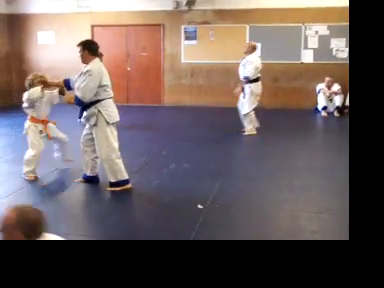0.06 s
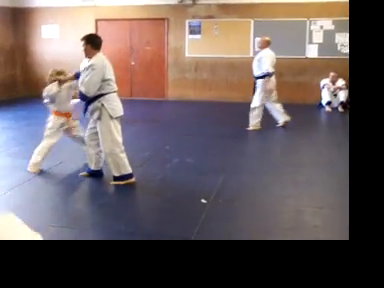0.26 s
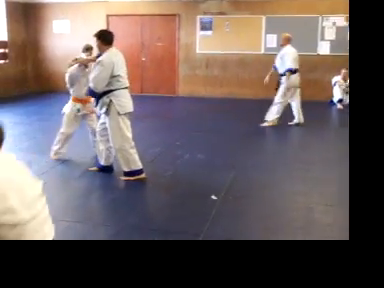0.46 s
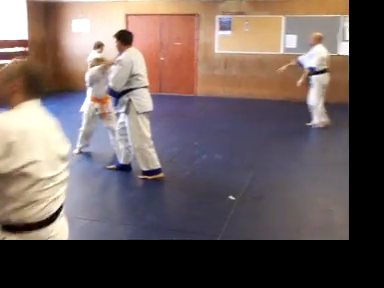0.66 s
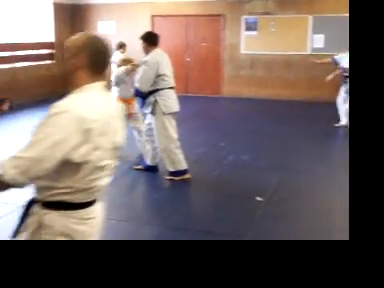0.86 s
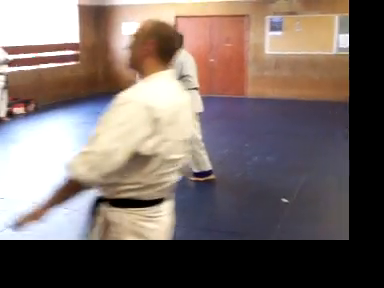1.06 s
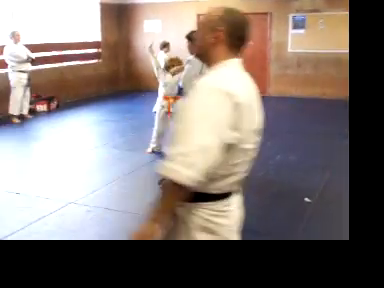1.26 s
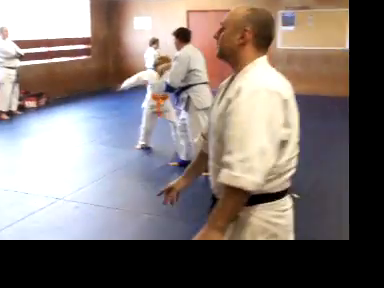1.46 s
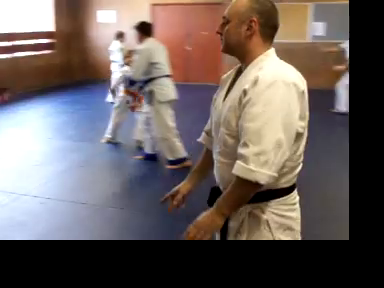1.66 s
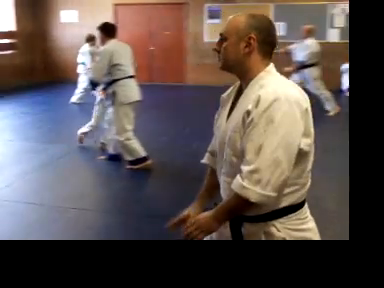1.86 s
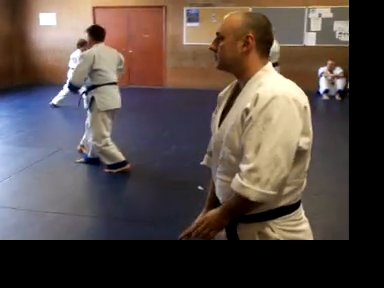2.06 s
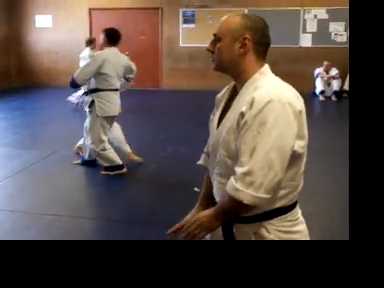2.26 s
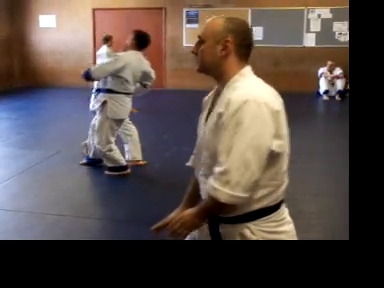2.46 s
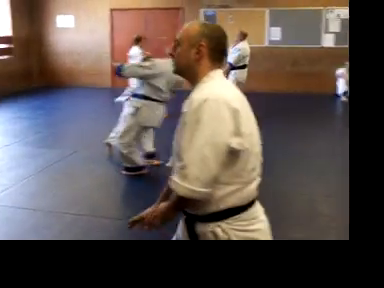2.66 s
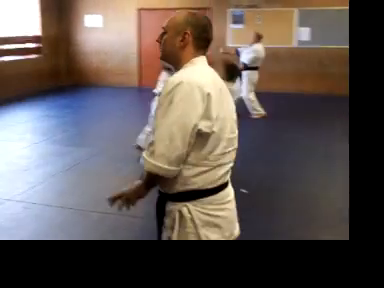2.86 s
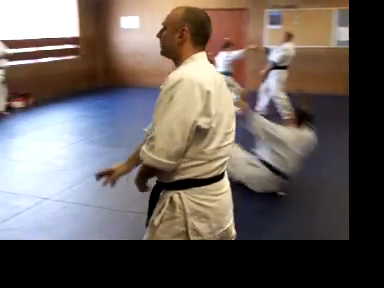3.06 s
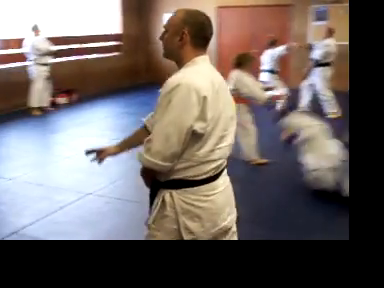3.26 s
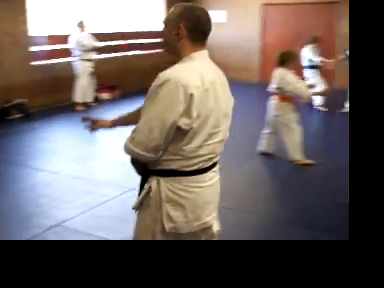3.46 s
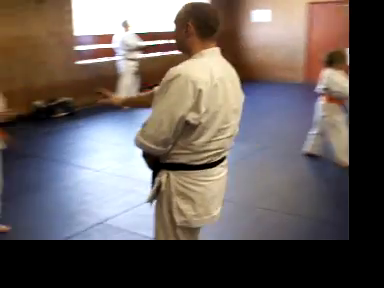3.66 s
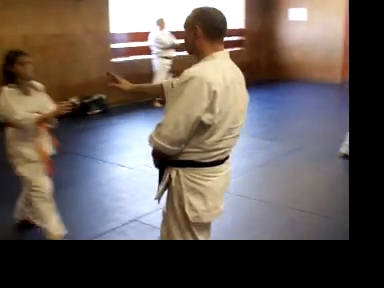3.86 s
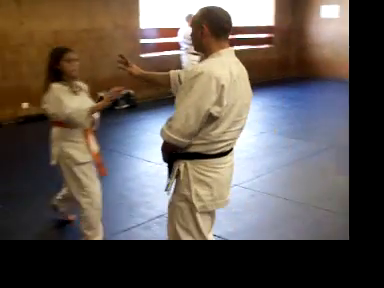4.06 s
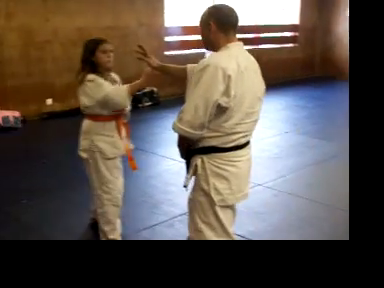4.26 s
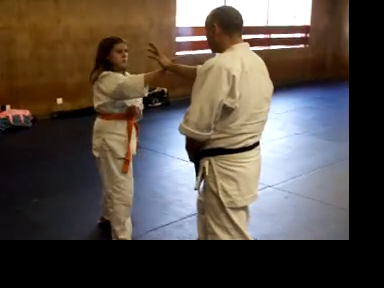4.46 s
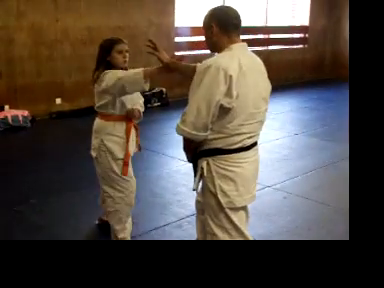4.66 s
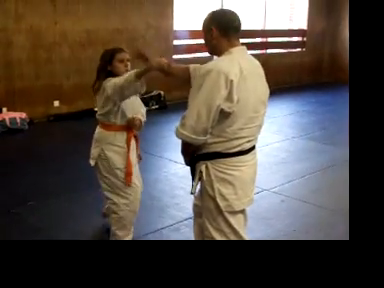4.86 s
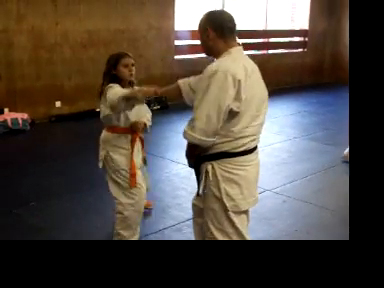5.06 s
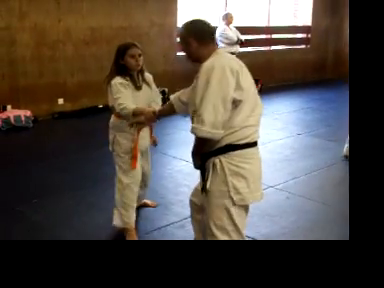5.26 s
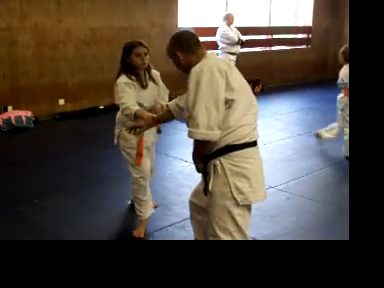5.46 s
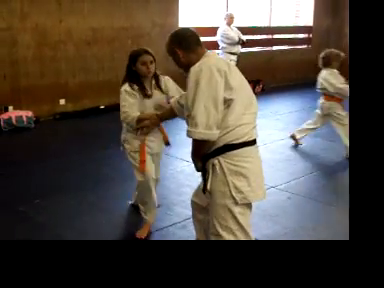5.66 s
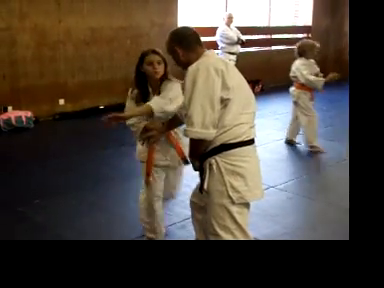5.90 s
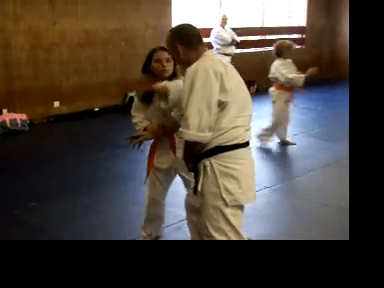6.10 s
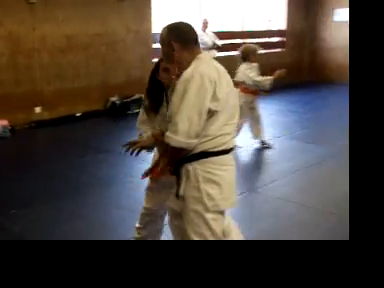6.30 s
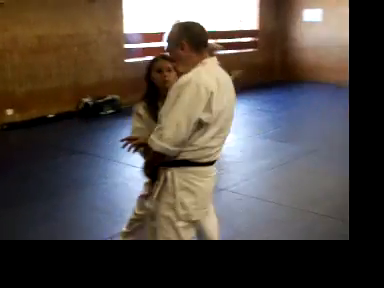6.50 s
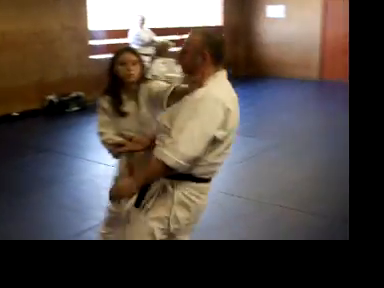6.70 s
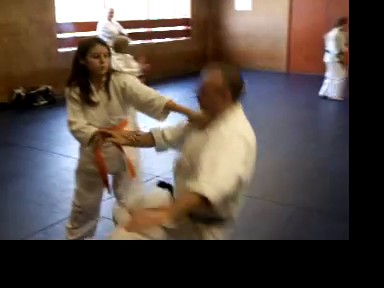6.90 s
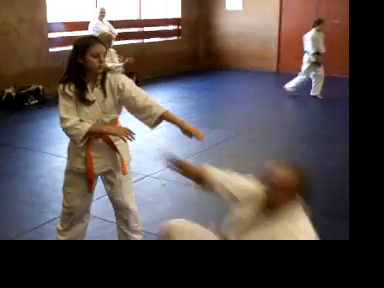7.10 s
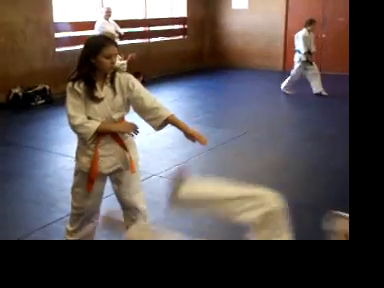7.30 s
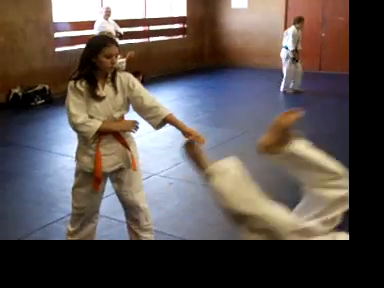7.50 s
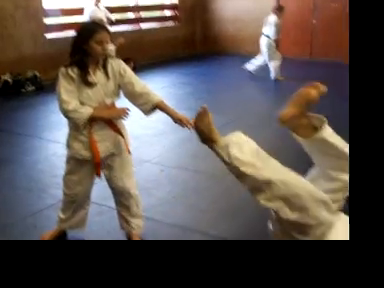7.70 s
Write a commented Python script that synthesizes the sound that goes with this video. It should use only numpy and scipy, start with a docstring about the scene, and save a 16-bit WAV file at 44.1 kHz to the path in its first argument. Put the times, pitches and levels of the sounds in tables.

```python
"""Throwing practice on vinyl mats.

Bare feet and cotton jackets swish over the steady air noise of a hard-walled training hall.
Three times a body tumbles and lands: the slaps overload a small mono microphone,
the floor booms and the hall rings on with a bright wash."""
import sys
import numpy as np
from scipy import signal
from scipy.fft import rfft, irfft, next_fast_len
from scipy.io import wavfile

SR = 44100
rng = np.random.default_rng(int(sys.argv[2]) if len(sys.argv) > 2 else 0)


def inscribe(sig):
    """Save sig as 16-bit PCM at rate SR to the path in sys.argv[1].

    A 1-D sig is mono; a 2-D sig holds one channel per row.
    Samples are clipped to [-1, 1] before scaling.
    """
    pcm = np.round(np.clip(np.atleast_2d(sig).T, -1, 1) * 32767)
    wavfile.write(sys.argv[1], SR, pcm.astype(np.int16))


N = 341334
TIME_S = np.arange(N) / SR

# a body lands flat: start_s, wash_db, wash_length_s, air_dip_delay_s
BODY_LANDINGS = [(3.201, -19.5, .67, 0.49), (5.063, -20, 0.638, 0.43), (7.203, -22, .6, 0.31)]


def from_db(db):
    """Decibels to gain."""
    return 10 ** (np.asarray(db) / 20)


def unit_rms(x):
    """Scale to unit power."""
    return x / np.sqrt(np.mean(x ** 2) + 1e-20)


def gain_curve(points):
    """Gain along time_s, level_db points."""
    return from_db(np.interp(TIME_S, *np.transpose(points)))


def drift(rate_hz):
    """Unit-RMS random wander, rate_hz knots a second."""
    knots = rng.standard_normal(8192)
    return unit_rms(np.interp(TIME_S * rate_hz, np.arange(len(knots)), knots))


def noise(spectrum, grain_db=0):
    """Unit-RMS coloured noise; grain_db roughens it into unequal tiny clicks."""
    size = next_fast_len(N)
    clicks = rng.standard_normal(N) * from_db(grain_db * drift(900))
    freq_hz, level_db = np.transpose(spectrum)
    bins_hz = np.maximum(np.arange(size // 2 + 1) * SR / size, 1)
    gain = from_db(np.interp(np.log(bins_hz), np.log(freq_hz), level_db, left=-90, right=-90))
    return unit_rms(irfft(rfft(clicks, size) * gain, size)[:N])


def resonance(pitch_hz, width_hz):
    """Unit-RMS noise in one band."""
    edges_hz = [pitch_hz - width_hz / 2, pitch_hz + width_hz / 2]
    band = signal.butter(2, edges_hz, "band", fs=SR, output="sos")
    return unit_rms(signal.sosfilt(band, rng.standard_normal(N)))


def swell(start_s, length_s, attack_s, release_s, sag_db_per_s=0):
    """Gain that rises, sags while held, then dies away."""
    age_s = np.maximum(TIME_S - start_s, 0)
    rise = np.minimum(age_s / attack_s, 1)
    held = from_db(-sag_db_per_s * np.minimum(age_s, length_s))
    return rise * held * np.exp(-np.clip((age_s - length_s) / release_s, 0, 20))


def power_sum(gains):
    """Joint gain of unrelated noises."""
    return np.sqrt(sum(gain ** 2 for gain in gains))


def air():
    """The hall's steady rush and a faint hollow whir; the rush dips briefly after each landing."""
    rush_spectrum = [(15, -2), (32, 4), (60, 2), (130, 0), (200, -4), (400, -4), (750, -4.5), (1100, -2.5),
                     (1700, -4.5), (2600, -5.5), (5000, -3), (7500, -11.5), (9000, -49)]  # freq_hz, level_db
    rush_levels = [(0, -30.7), (1.55, -31.5), (2.2, -31.3), (2.55, -29), (2.8, -30.5), (3.3, -26.5),
                   (4.05, -32), (4.4, -32), (4.8, -29.5), (6.1, -31.5), (6.6, -29), (7.74, -28)]  # time_s, level_db
    whir_modes = [(1110, 160, -5), (1453, 110, -10)]  # pitch_hz, width_hz, level_db
    whir_levels = [(0, -53), (.8, -48), (1.6, -43.5), (2.25, -36.5), (2.6, -41), (2.95, -40.5), (3.3, -54),
                   (7.74, -48.5)]  # time_s, level_db
    dip_db, dip_width_s = -8, 0.13
    whir = unit_rms(sum(from_db(level_db) * resonance(pitch_hz, width_hz)
                        for pitch_hz, width_hz, level_db in whir_modes))
    dips = sum(np.exp(-((TIME_S - start_s - delay_s) / dip_width_s) ** 2)
               for start_s, _, _, delay_s in BODY_LANDINGS)
    rush = gain_curve(rush_levels) * from_db(dip_db * dips) * noise(rush_spectrum, grain_db=0.85)
    return rush + gain_curve(whir_levels) * whir


def footwork():
    """Cotton rubs dully, soles slide brightly; both catch and slip unevenly."""
    steps = [(-.04, 0.35, -29, -25.5), (0.243, 0.037, -32, -21.5), (0.327, 0.33, -27.5, -24),
             (0.753, 0.12, -29, -23), (0.994, 0.18, -28.5, -25.5), (1.21, 0.034, -29, -23),
             (1.386, .14, -31.5, -29.5), (1.555, 0.13, -28.5, -25), (1.665, 0.13, -28.5, -24.5),
             (1.903, 0.11, -29, -25), (2.163, 0.14, -30.5, -28.5), (2.25, 0.16, -35, -28.5),
             (2.396, 0.13, -31, -26), (2.667, 0.26, -50, -37), (2.825, 0.15, -33, -28),
             (2.95, .1, -32.5, -30), (3.053, 0.085, -29, -24.5), (3.93, 0.096, -28.5, -27),
             (4.097, 0.08, -29, -27.5), (4.404, .03, -59, -46), (4.54, 0.062, -36.5, -28),
             (4.59, 0.11, -32, -30), (4.828, 0.25, -34, -29.5), (4.93, 0.22, -31.5, -27.5),
             (5.277, 0.086, -28, -32), (5.693, 0.14, -26, -24.5), (5.88, 0.12, -35, -30.5),
             (6.1, 0.047, -35, -30), (6.203, 0.11, -32, -27.5), (6.288, 0.066, -29.5, -23.5),
             (6.397, 0.097, -31, -28), (6.505, 0.041, -27.5, -23.5), (6.618, 0.13, -35.5, -39),
             (6.796, .11, -29.5, -26), (6.96, 0.13, -31.5, -29), (7.077, 0.076, -28, -25.5),
             (7.298, 0.037, -26.5, -25.5)]  # steps and turns: start_s, length_s, cotton_db, sole_db
    cotton_spectrum = [(900, -32.5), (1400, -14.5), (1900, -13), (2400, -8), (3200, -3.5), (4200, -2.5),
                       (5200, -9.5), (6500, -25.5)]  # freq_hz, level_db
    sole_spectrum = [(3200, -31), (4300, -7), (5200, -2), (6200, -3), (7200, -7), (7900, -15.5),
                     (8600, -19.5), (9200, -26.5)]  # freq_hz, level_db
    shuffle_db = -39.5  # others in the hall never stand quite still
    rub_power = slide_power = from_db(shuffle_db) ** 2
    for start_s, length_s, cotton_db, sole_db in steps:
        motion = swell(start_s, length_s, attack_s=0.037, release_s=0.1, sag_db_per_s=8.5)
        rub_power = rub_power + (from_db(cotton_db) * motion) ** 2
        slide_power = slide_power + (from_db(sole_db) * motion) ** 2
    rub, slide = np.sqrt(rub_power), np.sqrt(slide_power)
    cotton = rub * noise(cotton_spectrum)
    soles = slide * noise(sole_spectrum, grain_db=1)
    stick_slip = from_db(1 + 0.71 * drift(70))
    return (cotton + soles) * stick_slip + crease_ticks(slide)


def crease_ticks(motion, rate_hz=15):
    """Stiff cotton creases snap at random, louder with stronger motion."""
    snaps = (rng.random(N) < rate_hz / SR) * (2 * rng.random(N) - 1)
    band = signal.butter(1, [1500, 7500], "band", fs=SR, output="sos")
    return from_db(24) * signal.sosfilt(band, snaps * motion)


def skids():
    """A sole drags and half squeaks."""
    drags = [(1.052, 0.013, 4460, 600, -18), (1.13, 0.17, 4650, 500, -28.5),
             (2.217, 0.042, 3400, 400, -28.5), (2.503, 0.32, 5360, 750, -25)]  # peak_s, length_s, pitch_hz, width_hz, level_db
    out = np.zeros(N)
    for peak_s, length_s, pitch_hz, width_hz, level_db in drags:
        envelope = np.exp(-(2 * (TIME_S - peak_s) / length_s) ** 2)
        out += from_db(level_db) * envelope * resonance(pitch_hz, width_hz)
    return out


def thuds():
    """Foam gives under a heel or body and swings back in damped cycles."""
    impacts = [(1.274, -34, 201, 0.11), (1.706, -32, 93, 0.081), (2.428, -36, 137, 0.11),
               (2.965, -35, 115, .1), (3.054, -26, 125, 0.058), (3.1949, -3, 226, 0.04),
               (3.201, -3, 130, 0.07), (3.933, -14.5, 217, 0.044), (3.962, -20, 140, 0.091),
               (5.0577, -2, 83, 0.033), (5.069, -10, 162, 0.1), (5.196, -16.5, 216, 0.2),
               (5.428, -18.5, 109, 0.11), (6.168, -33, 150, .12), (6.899, -23.5, 101, 0.091),
               (7.057, -15, 75, 0.12), (7.191, -19, 230, 0.028), (7.1975, -9, 106, 0.054),
               (7.209, -7.5, 126, 0.089), (7.284, -11, 97, 0.18), (7.444, -20, 103, .14)]  # start_s, level_db, pitch_hz, t60_s
    out = np.zeros(N)
    for start_s, level_db, pitch_hz, t60_s in impacts:
        age_s = np.clip(TIME_S - start_s, 0, 1)
        out += from_db(level_db - 60 * age_s / t60_s) * np.sin(2 * np.pi * pitch_hz * age_s)
    return signal.sosfilt(signal.butter(1, 40, "high", fs=SR, output="sos"), out)


def draught():
    """A falling body fans a very low puff across the microphone."""
    puffs = [(2.853, 0.3, -32), (4.98, .07, -21)]  # start_s, length_s, level_db
    puff_spectrum = [(10, -3), (18, 10), (26, -11), (42, -27), (80, -38)]  # freq_hz, level_db
    envelope = power_sum(from_db(level_db) * swell(start_s, length_s, attack_s=0.043, release_s=0.012)
                         for start_s, length_s, level_db in puffs)
    return envelope * noise(puff_spectrum)


def tumbles():
    """Back, hip and heels roll over the mat in a lumpy run of soft contacts."""
    rolls = [(2.93, .09, -35.5), (3.03, 0.086, -22), (3.211, 0.18, -33), (3.91, .1, -33),
             (3.976, 0.054, -35), (4.948, .04, -30), (4.988, 0.03, -25.5), (6.91, .11, -32.5),
             (7.042, 0.081, -23), (7.216, 0.18, -27.5)]  # start_s, length_s, level_db
    roll_spectrum = [(20, -6), (50, 1), (110, 3.5), (250, -1.5), (450, -2.5), (750, -10.5), (1400, -15),
                     (2500, -10), (4000, -28)]  # freq_hz, level_db
    weight = power_sum(
        from_db(level_db) * swell(start_s, length_s, attack_s=0.012, release_s=0.086, sag_db_per_s=66.5)
        for start_s, length_s, level_db in rolls)
    lumps = from_db(3 + 0.33 * drift(80))
    return lumps * weight * noise(roll_spectrum, grain_db=3)


def slaps(release_s=0.0011):
    """Skin cracks on vinyl and trapped air claps out while the contact spreads."""
    smacks = [(2.952, -19, .001, -39), (3.013, -16, 0.00058, -36), (3.1942, -5, 0.0031, -3),
              (3.1978, -10, 0.003, -13), (3.2026, -9.5, 0.0036, -11.5), (3.211, -5, 0.001, -17),
              (3.906, -16.5, 0.01, -48), (5.0644, -2.5, 0.0023, -9.5), (5.0704, -6, 0.0024, -17),
              (5.078, -14, 0.0023, -35), (5.722, -21, 0.0049, -39), (7.028, -16.5, 0.0022, -22.5),
              (7.0637, -9, 0.002, -14), (7.069, -17, 0.0014, -25), (7.189, -13, 0.0012, -18),
              (7.191, -5, 0.0054, -5.5), (7.202, -11, 0.0018, -29), (7.212, -15, 0.00088, -32)]  # start_s, crack_db, length_s, clap_db
    crack_spectrum = [(400, -21), (1100, -1), (2500, 1.5), (5000, 5), (6600, 3), (8000, -8.5), (9200, -19)]  # freq_hz, level_db
    clap_spectrum = [(130, 2), (250, 10.5), (400, -1.5), (700, -1), (1200, -6), (2200, -35), (4000, -41)]  # freq_hz, level_db
    crack, clap = np.zeros(N), np.zeros(N)
    for start_s, crack_db, length_s, clap_db in smacks:
        age_s = TIME_S - start_s
        contact = (age_s > 0) * np.exp(-np.maximum(age_s - length_s, 0) / release_s)
        crack += from_db(crack_db) * contact
        clap += from_db(clap_db) * contact
    return crack * noise(crack_spectrum, grain_db=0.5) + clap * noise(clap_spectrum)


def hall_wash():
    """Reflections of each landing crowd into a bright, slightly fluttering wash."""
    wash_spectra = [
        [(500, -38), (1000, -17.5), (1500, -12), (2200, -7.5), (3300, -9), (4000, -4), (4700, -3), (5600, -7),
         (7000, -13), (8000, -25), (9000, -30)],
        [(500, -35), (900, -17), (1300, -26), (1800, -14), (2400, -17.5), (2900, -7.5), (4200, -7),
         (5600, -6.5), (6300, -12), (7200, -18), (8000, -31.5), (9000, -33)],
        [(500, -18.5), (1100, -19.5), (1700, -11.5), (2300, -5.5), (3000, -4), (3900, -7), (5000, -3),
         (6200, -9), (7200, -12.5), (8000, -22), (9000, -27.5)],
    ]  # one per landing: freq_hz, level_db
    out = np.zeros(N)
    for (start_s, wash_db, length_s, _), spectrum in zip(BODY_LANDINGS, wash_spectra):
        envelope = swell(start_s, length_s, attack_s=0.055, release_s=0.13, sag_db_per_s=4.5)
        out += from_db(wash_db) * envelope * noise(spectrum, grain_db=0.9)
    return out * from_db(0.6 + 0.5 * drift(120))


def floor_boom():
    """Three broad floor modes beat together; the highest dies first, so the boom sinks in pitch."""
    modes = [(94.7, 37, -3, 3.57), (138, 32, -3, 1.76), (214, 57, -4, 1.07)]  # pitch_hz, width_hz, level_db, t60_s
    impacts = [(3.205, -28, -24, -23), (3.94, -36.5, -32, -32), (5.075, -26, -20, -22.5),
               (7.205, -20, -24.5, -24.5)]  # start_s, low_mode_db, mid_mode_db, high_mode_db
    shudder = from_db(1.1 * drift(40))  # loose mats bounce, fluttering all modes alike
    out = np.zeros(N)
    for k, (pitch_hz, width_hz, level_db, t60_s) in enumerate(modes):
        ring = signal.hilbert(resonance(pitch_hz, width_hz))
        even_ring = unit_rms(ring.real / (np.abs(ring) + 1))
        release_s = t60_s / np.log(1000)
        decay = power_sum(from_db(mode_db[k]) * swell(start_s, 0, attack_s=0.0089, release_s=release_s)
                          for start_s, *mode_db in impacts)
        out += from_db(level_db) * decay * even_ring
    return out * shudder


def scene():
    """All sources at one microphone, alike in both channels."""
    falls = draught() + tumbles() + slaps() + thuds() + floor_boom() + hall_wash()
    mono = footwork() + skids() + falls + air()
    return np.array([mono, mono])


def record(dry):
    """Slaps flatten against the input limit; the treble is rolled off, then cut."""
    limit, rolloff_hz, cutoff_hz = 0.72, 8400, 9100
    clipped = dry / (1 + (dry / limit) ** 8) ** (1 / 8)
    gentle_lowpass = signal.firwin(61, rolloff_hz, fs=SR)
    steep_lowpass = signal.firwin(401, cutoff_hz, window=("kaiser", 9), fs=SR)
    softened = signal.convolve(clipped, gentle_lowpass[None], "same")
    return signal.convolve(softened, steep_lowpass[None], "same")


dry = scene()
out = record(dry)
inscribe(out)
```